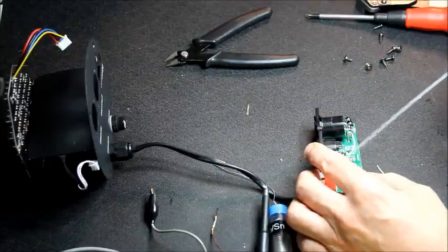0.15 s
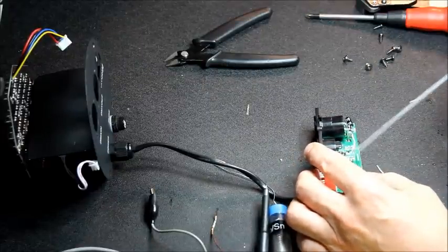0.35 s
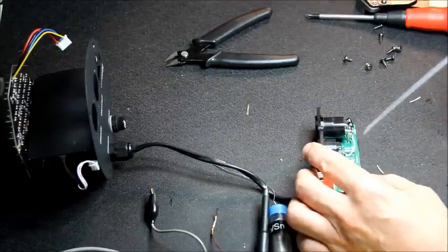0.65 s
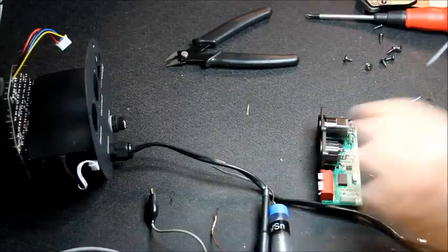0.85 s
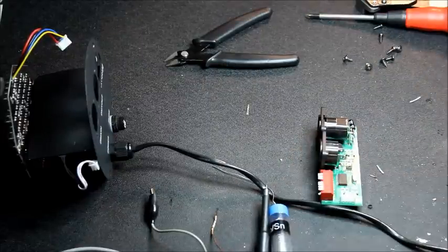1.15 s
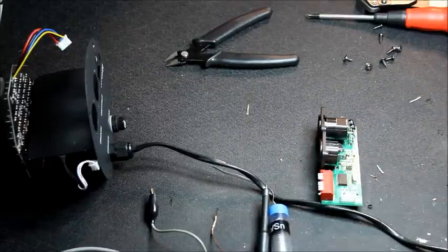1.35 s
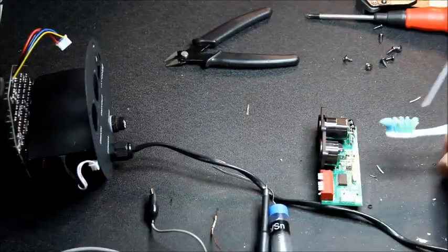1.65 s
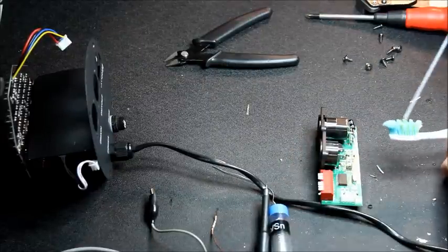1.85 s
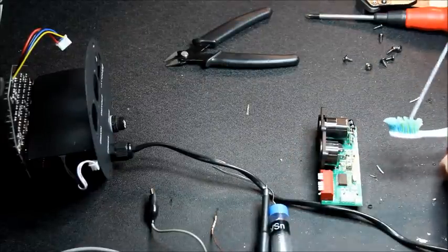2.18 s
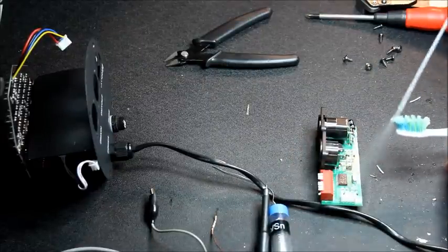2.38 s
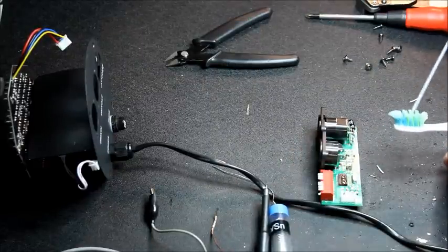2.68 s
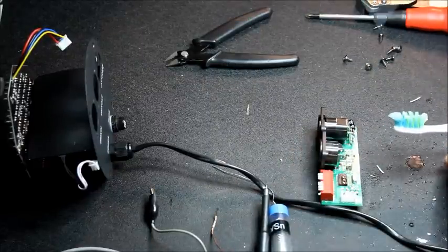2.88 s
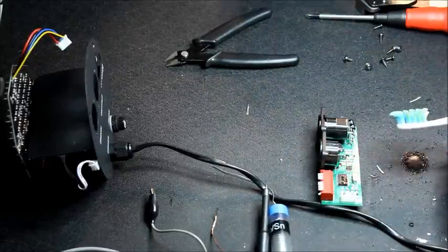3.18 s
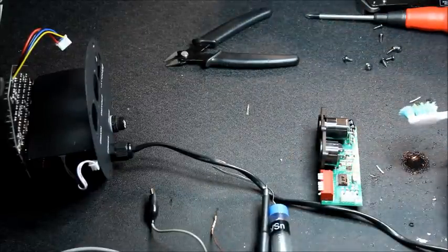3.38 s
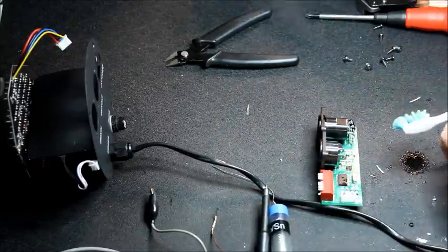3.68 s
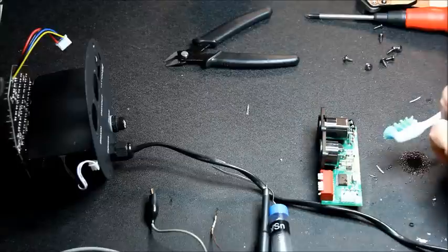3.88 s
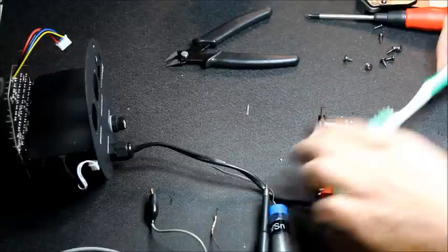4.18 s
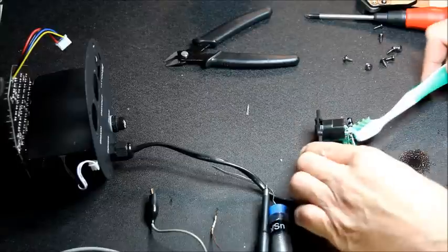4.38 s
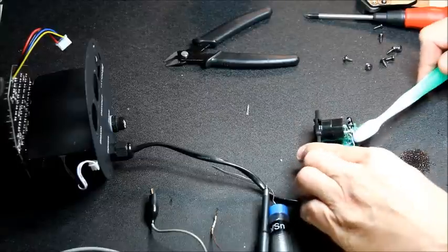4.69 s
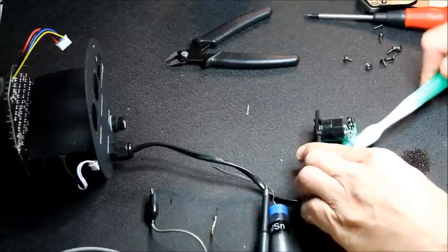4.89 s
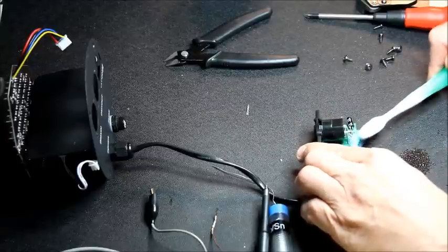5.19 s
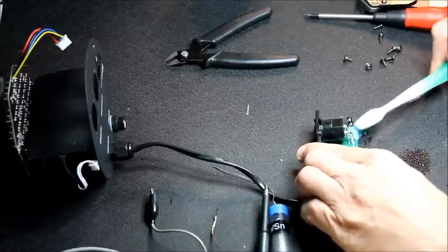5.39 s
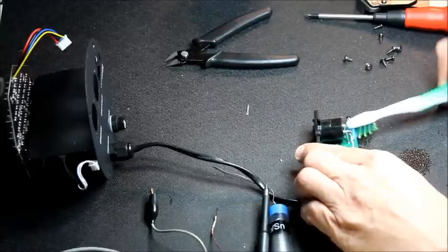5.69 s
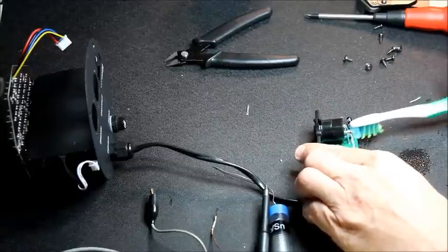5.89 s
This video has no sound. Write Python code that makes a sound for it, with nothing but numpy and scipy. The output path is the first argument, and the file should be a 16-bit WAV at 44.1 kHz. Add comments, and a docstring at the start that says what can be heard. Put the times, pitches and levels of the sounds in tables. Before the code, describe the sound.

Two spray hisses, a small board set down, a loud ringing can knock, then a wet toothbrush scrubbing over a faint hum.

```python
"""Cleaning a circuit board.

Close to one microphone, cleaner hisses through a straw onto a small board, then onto a toothbrush.
The board is laid down, the can lands hard on the workbench and rings, and wet bristles scrub the
board over a mains hum. The knock overloads the recorder, which turns itself down and recovers."""
import sys
import numpy as np
from scipy import signal
from scipy.fft import rfft, irfft, next_fast_len
from scipy.io import wavfile
from scipy.ndimage import minimum_filter1d, map_coordinates

SR = 44100
rng = np.random.default_rng(int(sys.argv[2]) if len(sys.argv) > 2 else 0)


def master(y):
    """Save y as 16-bit WAV."""
    cut = np.clip(np.atleast_2d(y).T, -1, 1)
    pcm = np.round(cut * 32767)  # scale
    wavfile.write(sys.argv[1], SR, pcm.astype(np.int16))


N = 266805


def amp(db):
    """Turn decibels into a factor to multiply by."""
    return 10 ** (np.asarray(db) / 20)


def unit(x):
    """Scale a sound to an average power of 1."""
    return x / np.sqrt(np.mean(x ** 2) + 1e-20)


def along(points, hz):
    """Read a curve of (Hz, value) points on a logarithmic frequency scale."""
    f, v = np.transpose(points)
    return np.interp(np.log(hz + 1), np.log(f + 1), v)


def colour(spectrum, peaks, f):
    """Gain at frequencies f: a broad tone curve with resonances on top."""
    peaks_db = sum(db / (1 + (2 * (f - hz) / width) ** 2) for hz, width, db in peaks)
    return amp(along(spectrum, f) + peaks_db)


def filtered(x, response):
    """Scale each frequency in x by response(Hz)."""
    size = next_fast_len(len(x) + SR // 4)
    return irfft(rfft(x, size) * response(np.fft.rfftfreq(size, 1 / SR)), size)[:len(x)]


def coloured(x, spectrum, peaks=()):
    """Give x a tone curve and resonances, at an average power of 1."""
    return unit(filtered(x, lambda f: colour(spectrum, peaks, f)))


def split(x, edge_hz):
    """The parts of x below and above a frequency."""
    low = filtered(x, lambda f: 1 / (1 + (f / edge_hz) ** 8))
    return low, x - low


def soften(x, edge_hz):
    """Gently turn down the treble."""
    return signal.lfilter(*signal.butter(1, min(edge_hz, SR / 3), fs=SR), x)


def wobble(rate):
    """A smooth curve through `rate` random values a second."""
    return map_coordinates(rng.standard_normal(int(N * rate / SR) + 4), [np.arange(N) * rate / SR])


def grains(rate, spread_db, share):
    """Tiny impacts, `rate` a second, carry a share of the power; the rest is a smooth rush."""
    ticks = (rng.random(N) < rate / SR) * rng.standard_normal(N)
    ticks *= amp(spread_db * rng.standard_normal(N))
    return np.sqrt(share) * unit(ticks) + np.sqrt(1 - share) * rng.standard_normal(N)


def swell(peak_s, length, rise, fall):
    """Speed of a short hand movement; rise and fall are shares of its length."""
    t = np.arange(N) / SR - peak_s
    return np.exp(-.5 * (t / (length * np.where(t < 0, rise, fall))) ** 2)


def gate(start, end, edge_s):
    """On from start to end, with a short fade at each edge."""
    t = np.arange(N) / SR
    return np.clip(np.minimum(t - start, end - t) / edge_s, 0, 1)


def add(track, start, sound):
    """Mix a sound in at `start` seconds."""
    part = track[round(start * SR):][:len(sound)]
    part += sound[:len(part)]


def room(air_db=-52):
    """A steady rush of air and hiss, with mains hum."""
    # Tone of the air. Each row: frequency in Hz, relative level in dB.
    air_tone = [(25, -20), (70, -7.5), (105, -2), (160, -10.5), (240, -2.5), (370, 5), (440, -1), (700, 0),
                (1500, -5.5), (4000, -9.5), (10000, -16), (15500, -15)]
    # Its resonances. Each row: frequency in Hz, width in Hz, boost in dB.
    air_peaks = [(195.4, 34, 14), (261, 25, 5.5), (314.5, 62, 10), (591, 32, 9.5), (730, 36, 3.5),
                 (1417, 99, 3.5)]
    # The hum. Each row: frequency in Hz, level in dB.
    hum_tones = [(120, -60), (600, -72)]
    t = np.arange(N) / SR
    hum = sum(amp(db) * np.sqrt(2) * np.sin(2 * np.pi * (hz * t + rng.random())) for hz, db in hum_tones)
    return amp(air_db) * coloured(rng.standard_normal(N), air_tone, air_peaks) + hum


def clicks(sharpness=4.9, crack_db=-9, crack_t60=0.029):
    """Valve, board and brush head make hard little contacts: a crack and a short pitched rattle."""
    # Each row: start in seconds, level in dB, pitch in Hz, seconds to fade by 60 dB (called t60).
    contacts = [(0.233, -49.5, 4400, 0.14), (0.277, -46.5, 6000, 0.1), (0.838, -33, 4100, 0.089),
                (0.844, -37.5, 2100, 0.079), (0.93, -42.5, 4150, 0.082), (1.254, -46, 3200, .08),
                (1.329, -46, 3400, 0.056), (1.347, -47.5, 7800, 0.078), (1.347, -37, 1120, 0.085),
                (1.924, -39, 3100, 0.047), (3.778, -41.5, 2580, 0.11), (4.110, -42.5, 1790, 0.08),
                (4.547, -49.5, 3500, 0.091), (5.771, -39, 2900, 0.053), (5.773, -37.5, 1570, 0.088),
                (5.929, -39.5, 2670, 0.22), (5.936, -42.5, 1680, 0.057)]
    out, t = np.zeros(N), np.arange(SR // 3) / SR
    for start, db, hz, t60 in contacts:
        rattle = unit(signal.lfilter(*signal.iirpeak(hz, sharpness, SR), rng.standard_normal(len(t))))
        crack = amp(crack_db - 60 * t / crack_t60) * rng.standard_normal(len(t))
        add(out, start, amp(db) * (rattle * amp(-60 * t / t60) + crack))
    return out


def valve(start, let_go, first_db, firmer_db, closing_s, open_s=0.077, dribble_db=-20.5, dribble_t60=1.54):
    """Flow of cleaner: the valve opens, is pressed ever harder, is let go, and the straw runs empty."""
    t = np.arange(N) / SR
    held = np.clip(t, start, let_go) - start
    after = np.maximum(t - let_go, 0)
    opening = amp(first_db * np.exp(-held / open_s) + firmer_db * held)
    shutting = np.exp(-.5 * (after / closing_s) ** 2)
    dribble = amp(dribble_db - 60 * after / dribble_t60)
    return gate(start, np.inf, edge_s=.006) * opening * np.maximum(shutting, dribble)


def spray(press, spectrum, peaks, mist_db, splash_db=-6.3):
    """A jet of droplets hisses from the straw; its mist is bright, its splash low and sputtering."""
    # Aim of the straw: a glancing jet makes more mist (+), a square hit more splash (-).
    # Each row: time in seconds, shift in dB.
    aim = [(0.38, 1), (0.48, -0.5), (0.55, 1), (0.64, -2), (2.1, 0.5), (2.18, -0.5), (2.35, 0.5),
           (2.48, -3.2), (2.63, 5), (2.73, 0), (2.85, 2)]
    start, let_go, jet_db, first_db, firmer_db, closing_s = press
    jet = valve(start, let_go, first_db, firmer_db, closing_s)
    aim_db = np.interp(np.arange(N) / SR, *np.transpose(aim))
    mist = jet ** 1.2 * amp(mist_db + aim_db)  # mist grows faster than the flow
    splash = jet * amp(splash_db - aim_db)
    droplets = coloured(grains(rate=5000, spread_db=3.5, share=0.07), spectrum, peaks)
    low, rest = split(droplets, edge_hz=1770)
    middle, high = split(rest, edge_hz=8700)
    sputter = amp(0.52 * wobble(70))
    level = amp(jet_db + 0.34 * wobble(45))
    return level * (jet * unit(middle) + mist * unit(high) + splash * unit(low) * sputter)


def sprays():
    """The jet hits the board, then the brush; each adds its own resonances to the hiss."""
    # Each press: start and release in seconds, jet level in dB, offset in dB as it first opens,
    # growth in dB per second held, closing time in seconds.
    board_press = (0.2852, 0.59, -39, -8, 8.5, 0.0557)
    brush_press = (1.9269, 2.861, -36.5, -15.5, 2.3, 0.027)
    # Tone of each hiss. Each row: frequency in Hz, relative level in dB.
    board_hiss = [(60, -28), (150, -14), (330, -2), (450, 0), (1000, -4), (3000, -2), (6000, 0),
                  (10000, -3.5), (15500, -9)]
    brush_hiss = [(60, -40), (150, -19), (310, -5.5), (450, -0.5), (1000, -9), (3000, -7.5), (6000, -3),
                  (10000, -2), (15500, -1)]
    # Resonances of what is hit. Each row: frequency in Hz, width in Hz, boost in dB.
    board_peaks = [(502, 150, 9.2), (700, 40, 10.5), (915, 77, 9.9), (1280, 300, 14.7), (1985, 330, 7.6),
                   (2396, 153, 10), (3120, 170, 7.2), (3390, 200, 8.2), (3932, 430, 4.3), (6200, 370, 6.3),
                   (7650, 160, 8.5)]
    brush_peaks = [(661, 44, 8.2), (980, 310, 12.4), (1256, 370, 11), (1520, 60, 6.7), (2027, 410, 10.1),
                   (2295, 100, 6.7), (2465, 120, 6.8), (3270, 650, 12.6), (4010, 370, 6.5),
                   (4460, 330, 5.6), (4780, 200, 7.2), (7000, 240, 4.4)]
    on_board = spray(board_press, board_hiss, board_peaks, mist_db=-4.5)
    return on_board + spray(brush_press, brush_hiss, brush_peaks, mist_db=-2.0)


def bench(push_db=9, clutter_db=-1, sway_t60=.25):
    """Each blow rings the bench top, shakes its clutter and rocks its frame; soft blows sound dull."""
    # Each row: start in seconds, knock strength in dB, treble cutoff in Hz, sway strength in dB.
    blows = [(0.323, -33.5, 300, -50), (0.846, -47.5, 2500, -48), (1.255, -54, 600, -45),
             (1.35, -38.5, 2500, -49), (1.401, -44.5, 900, -53), (3.413, 2.5, 3200, -44),
             (3.431, -11, 915, -45), (3.493, -20, 800, -54), (3.78, -28.5, 896, -42),
             (3.812, -27, 595, -36.5), (3.85, -42, 300, -47), (4.43, -58, 400, -51), (4.77, -56, 400, -51),
             (5.77, -36.5, 5000, -44), (6.012, -47, 900, -45)]
    # Tones of the thud and of the swaying frame. Each row: frequency in Hz, relative level in dB.
    thud_tone = [(30, -23), (95, -31), (140, -14.5), (185, -7), (250, -2), (450, -3.5), (700, -3),
                 (1200, -7), (2000, -13), (4000, -19), (8000, -25.5), (15500, -39.5)]
    sway_tone = [(20, -24), (45, -12), (65, -1), (95, -7), (130, 7), (190, -1.5), (400, -32), (1500, -79)]
    # Resonances of the top. Each row: frequency in Hz, width in Hz, boost in dB.
    top_peaks = [(135, 22, 4.5), (228.3, 33.4, 13.5), (265.5, 22, 7.5), (298, 50, 8), (351, 56, 9),
                 (395, 32.6, 19.5), (491, 30, 13), (628, 58, 16), (687, 21, 10.5), (726, 34, 7),
                 (766, 66, 11), (914, 74, 9.5), (1063, 100, 11.5), (1240, 170, 3), (1400, 70, 9),
                 (1514, 37, 8), (1650, 62, 9), (1840, 76, 13), (2320, 260, 9.5)]
    # How the clutter settles. Each row: frequency in Hz, seconds to fade by 60 dB.
    clutter_fade = [(80, 0.28), (240, 0.26), (400, 0.16), (1000, 0.17), (3000, 0.18), (12000, 0.14)]
    out, t = np.zeros(N), np.arange(SR // 2) / SR
    # Turn the thud's tone into one push that starts at full strength and rings down.
    cepstrum = irfft(np.log(colour(thud_tone, top_peaks, np.fft.rfftfreq(len(t), 1 / SR))))
    push = irfft(np.exp(rfft(2 * cepstrum * (t > 0) * (t < t[-1] / 2))))
    push = soften(push / abs(push).max(), edge_hz=1650)
    for start, db, cutoff_hz, sway_db in blows:
        noise = coloured(rng.standard_normal(len(t)), thud_tone, top_peaks)
        hz, times, bands = signal.stft(noise, SR, nperseg=256)
        fade = amp(-60 * times / along(clutter_fade, hz)[:, None])
        clutter = signal.istft(bands * fade, SR, nperseg=256)[1][:len(t)]
        knock = soften(amp(push_db) * push + amp(clutter_db) * clutter, cutoff_hz)
        sway = coloured(rng.standard_normal(len(t)), sway_tone) * amp(sway_db - 60 * t / sway_t60)
        add(out, start, amp(db) * knock + soften(sway, edge_hz=160))
    return out


def sliding():
    """The board and the fingers drag over the mat in small catches."""
    # Each row: loudest moment in seconds, relative level in dB, length in seconds.
    slides = [(0.88, -50.5, .07), (0.939, -46, 0.041), (1.255, -46, 0.047), (1.32, -50, .06),
              (1.42, -50, .07), (4.16, -55, .02), (4.28, -59, .3), (4.435, -54, 0.057)]
    # Tone of the mat. Each row: frequency in Hz, relative level in dB.
    mat_tone = [(88, -38), (150, -16), (228, -4.5), (725, -10.5), (928, -9.5), (2260, -14), (3370, -11.5),
                (3780, -16), (14000, -35.5)]
    speed = sum(amp(db) * swell(peak_s, length, rise=0.35, fall=0.62) for peak_s, db, length in slides)
    friction = coloured(grains(rate=1800, spread_db=7.0, share=0.35), mat_tone)
    catching = amp(1.9 * wobble(60))
    return amp(-1.5) * speed * friction * catching


def can(hollow_hz=1141, hollow_t60=0.85, rim_t60=0.26):
    """The steel can sings after landing, and its rim rattles as the hand lets go."""
    # Each row: start in seconds, rim level in dB, level of the hollow ring in dB.
    hits = [(3.413, -43, -32), (3.709, -34, -69)]
    # Resonances of the rim. Each row: frequency in Hz, width in Hz, boost in dB.
    rim_peaks = [(1350, 290, 12.5), (2046, 450, 6), (4840, 390, 13.5), (5150, 360, 10.5), (5590, 310, 10.5),
                 (7000, 400, 1), (9200, 810, 4.5)]
    rim_tone = [(150, -4.0), (400, 10.0), (3000, -4.0), (15000, -15)]  # Hz, relative dB
    out, t = np.zeros(N), np.arange(SR) / SR
    for start, rim_db, hollow_db in hits:
        rim = coloured(rng.standard_normal(len(t)), rim_tone, rim_peaks) * amp(rim_db - 60 * t / rim_t60)
        hollow = np.sin(2 * np.pi * hollow_hz * t) * amp(hollow_db - 60 * t / hollow_t60)
        add(out, start, rim + hollow)
    return out


def shifting(x, depth_db=1.0, width_hz=1500, change_s=.06):
    """The tone drifts at random, as the brush meets different parts."""
    hz, times, bands = signal.stft(x, SR, nperseg=256)
    place = np.meshgrid(hz / width_hz, times / change_s, indexing="ij")
    drift = map_coordinates(rng.standard_normal((64, 256)), place, mode="mirror")
    return signal.istft(bands * amp(depth_db * drift), SR, nperseg=256)[1][:N]


def scrubbing(flick_db=-2.5):
    """Wet bristles rub the board; each stroke swells the rubbing and flicks their tips off solder pins."""
    # The light rubbing under the strokes: start and end in seconds, level in dB.
    light_rub = (4.6, 6.1, -57)
    # Each row: loudest moment in seconds, level in dB, length in seconds, extra brightness in dB.
    strokes = [(4.614, -54, 0.014, 4), (4.665, -50, 0.042, 4), (4.742, -51.5, .012, 2),
               (4.778, -46.5, .028, 3), (4.85, -48, 0.019, 4), (4.89, -48, 0.043, -1),
               (4.967, -48.5, .05, 1), (5.0, -41, 0.032, 0), (5.072, -48.5, .06, -2),
               (5.184, -43.5, 0.027, -1), (5.25, -50, 0.033, -2), (5.296, -48, .018, -1.5),
               (5.353, -50, .022, 3.5), (5.385, -44.5, .032, -3.5), (5.44, -47, 0.027, 2),
               (5.491, -38.5, 0.031, 4), (5.542, -49, .04, 3.5), (5.59, -51, .055, 3),
               (5.767, -50.5, .025, 4), (5.843, -49, .045, 3.5), (5.943, -47, 0.048, 1),
               (6.013, -46.5, .026, 3.5)]
    # Tone of the bristles. Each row: frequency in Hz, relative level in dB.
    bristle_tone = [(60, -21), (150, -3.5), (400, -2.5), (1000, -17.5), (1900, -11.5), (3000, -2.5),
                    (6000, -13), (10000, -8), (15500, -5.5)]
    # Their resonances. Each row: frequency in Hz, width in Hz, boost in dB.
    bristle_peaks = [(703, 97, 11), (1030, 460, 12.5), (1400, 460, 9), (2310, 120, 3.5), (4050, 240, 6),
                     (5800, 960, 4.5), (7340, 1600, 7)]
    start, end, light_db = light_rub
    rub_power = flick_power = (amp(light_db) * gate(start, end, edge_s=.02)) ** 2
    for peak_s, db, length, bright_db in strokes:
        stroke = amp(db) * swell(peak_s, length, rise=0.47, fall=0.58)
        rub_power = rub_power + stroke ** 2
        flick_power = flick_power + (stroke * amp(bright_db)) ** 2
    friction = shifting(grains(rate=3000, spread_db=3, share=.5))
    body, tips = split(coloured(friction, bristle_tone, bristle_peaks), edge_hz=7800)
    rub = np.sqrt(rub_power) * unit(body)
    flick = amp(flick_db) * np.sqrt(flick_power) * unit(tips)
    catching = amp(1.37 * wobble(110))  # rows of bristles stick and slip unevenly
    return (rub + flick) * catching


def nearby(x, echo_db=-8, t60=0.1):
    """Tools and walls close by scatter a short echo, which blurs the treble."""
    t = np.arange(SR // 10) / SR
    echoes = rng.standard_normal(len(t)) * amp(-60 * t / t60)
    low, high = split(x, edge_hz=560)
    scattered = signal.fftconvolve(high, echoes / np.linalg.norm(echoes))[:N]
    return low + (high + amp(echo_db) * scattered) / np.hypot(1, amp(echo_db))


def scene():
    """Everything reaches one microphone, so both channels are the same."""
    hiss_and_rub = nearby(sprays() + scrubbing() + sliding())
    return np.tile(hiss_and_rub + clicks() + bench() + can() + room(), (2, 1))


def record(dry, threshold=0.75, most_db=8, hold_s=0.14, attack_s=0.036, release_s=0.23, top_hz=15830):
    """Overload turns the recorder down for a moment; the first peaks clip before it acts."""
    needed_db = np.clip(20 * np.log10(threshold / (abs(dry[0]) + 1e-9)), -most_db, 0)
    size = int(hold_s * SR) | 1
    held_db = minimum_filter1d(needed_db, size, origin=size // 2)
    fast_db, slow_db = (signal.fftconvolve(held_db, np.ones(n) / n)[:N]
                        for n in (int(attack_s * SR), int(release_s * SR)))
    ducked = dry[0] * amp(np.minimum(fast_db, slow_db))  # down quickly, back up slowly
    clipped = ducked / (1 + ducked ** 16) ** (1 / 16)
    return np.tile(filtered(clipped, lambda hz: hz < top_hz), (2, 1))


dry = scene()
out = record(dry)
master(out)
```